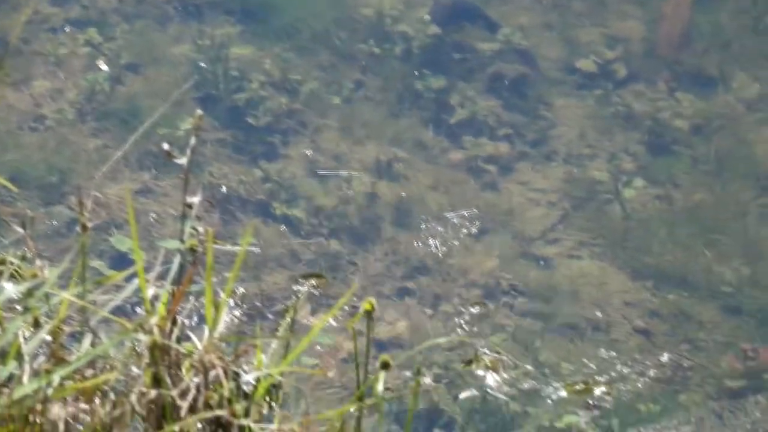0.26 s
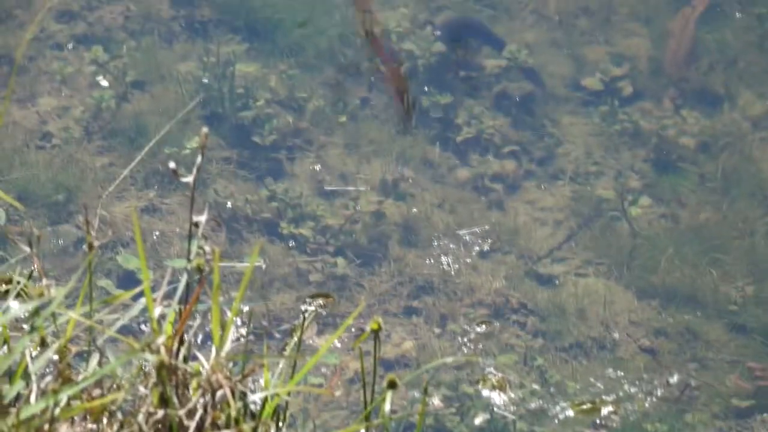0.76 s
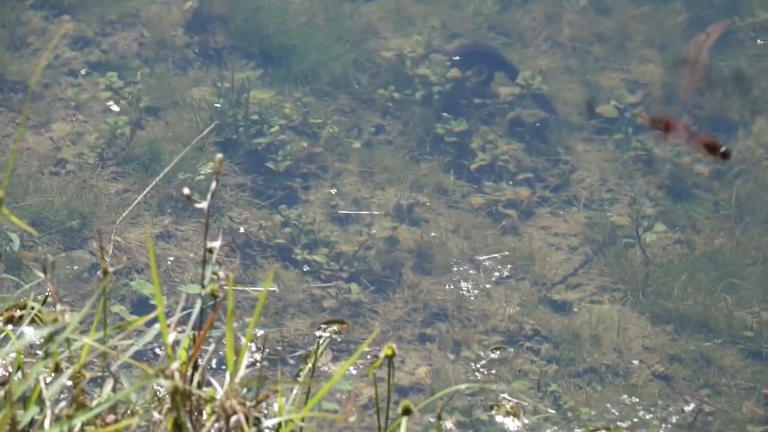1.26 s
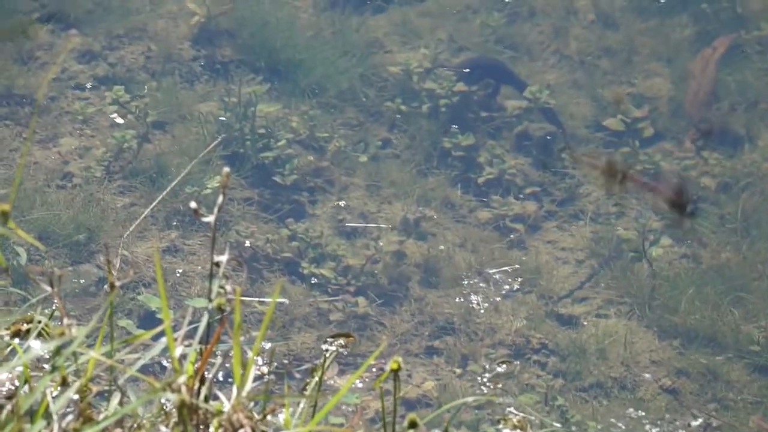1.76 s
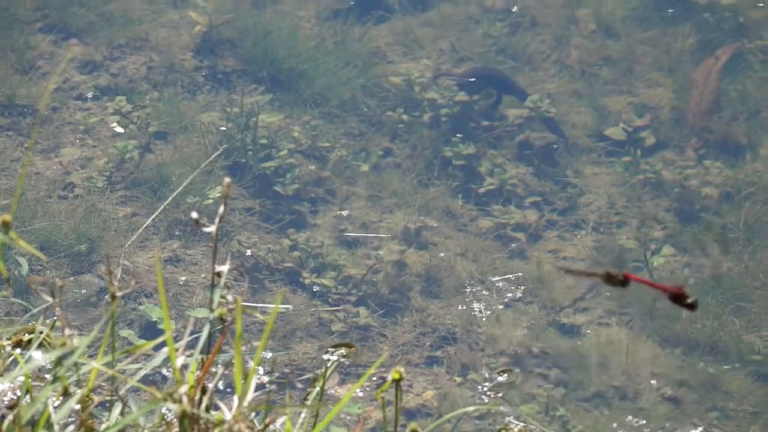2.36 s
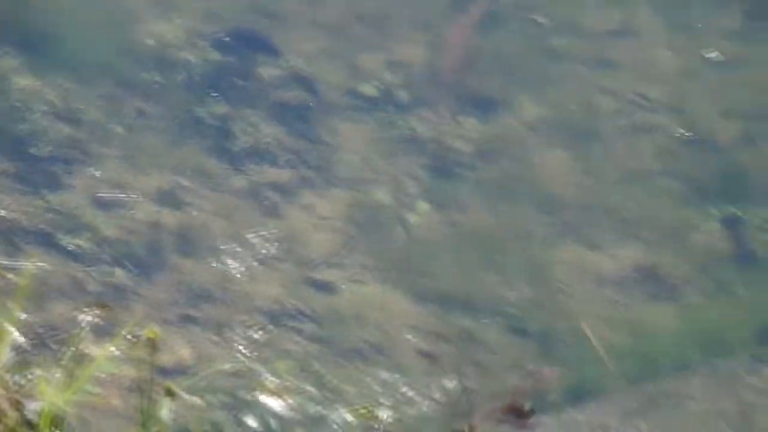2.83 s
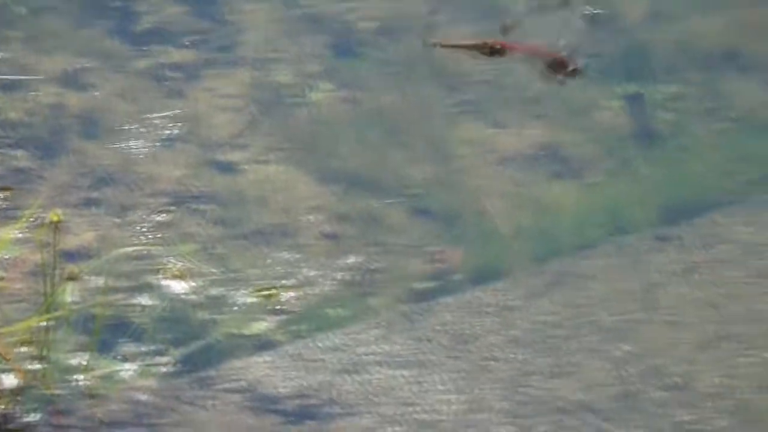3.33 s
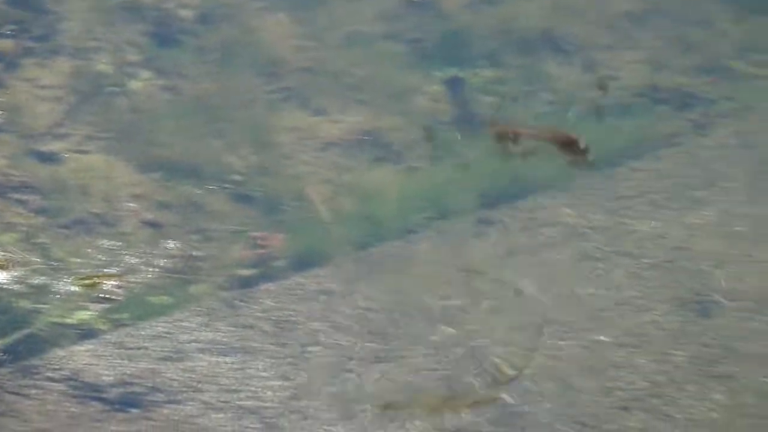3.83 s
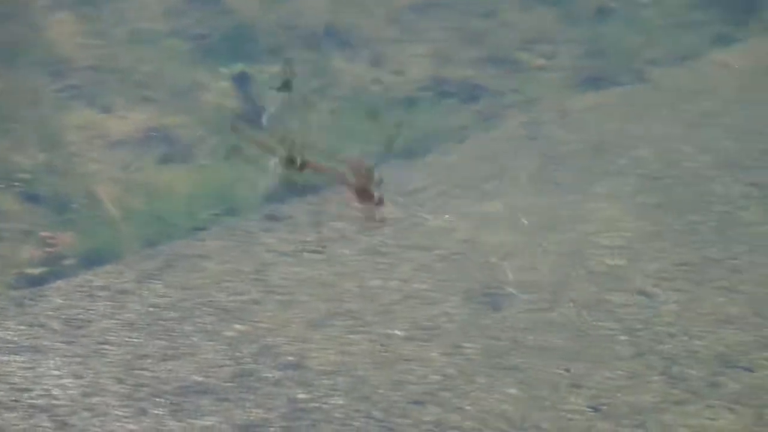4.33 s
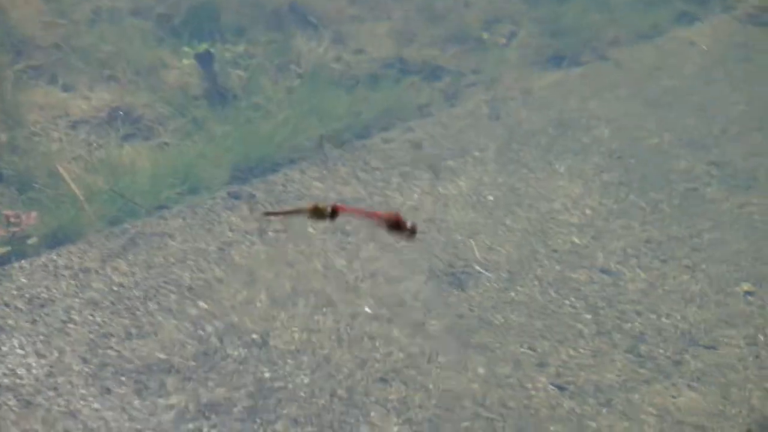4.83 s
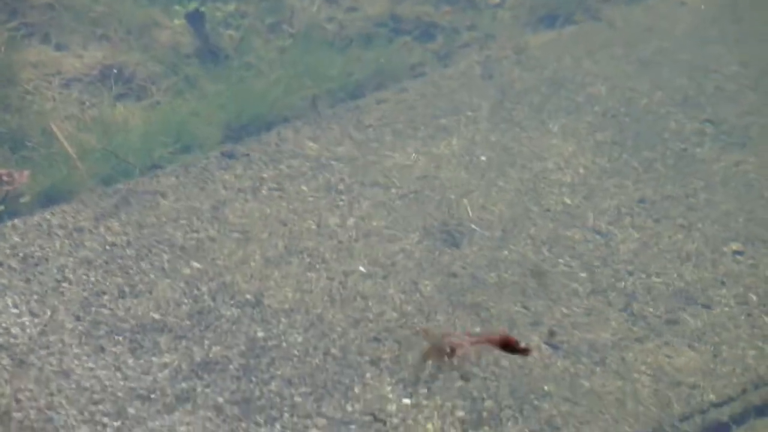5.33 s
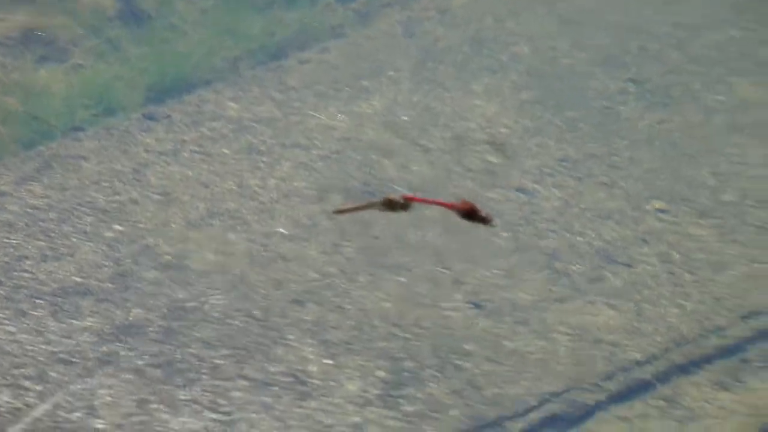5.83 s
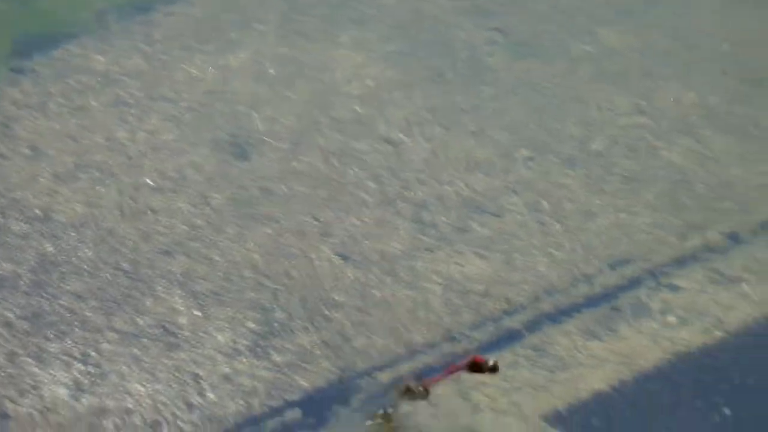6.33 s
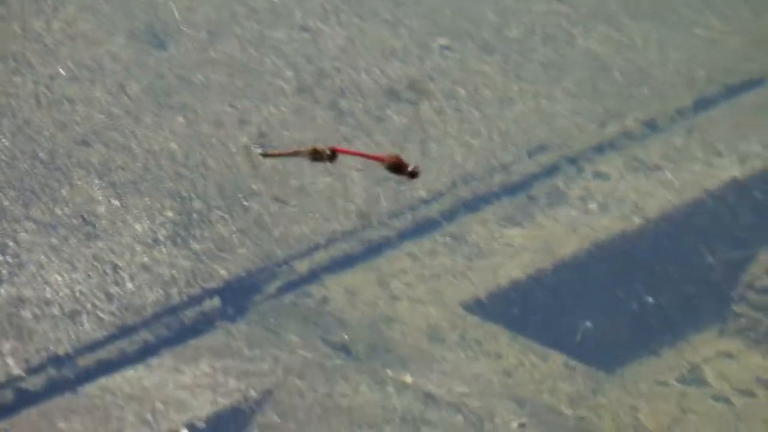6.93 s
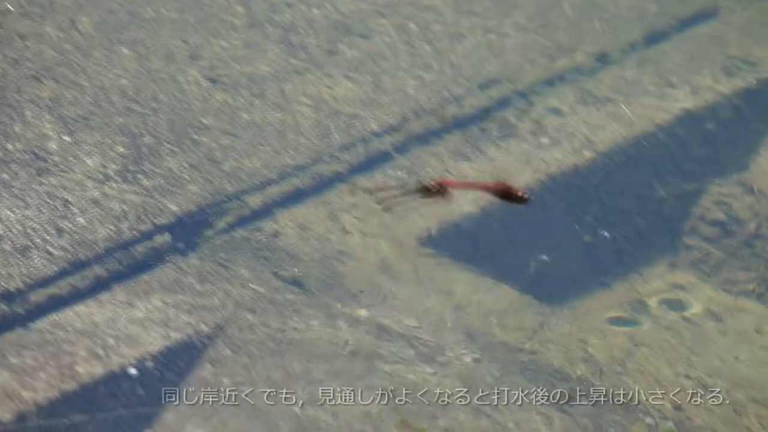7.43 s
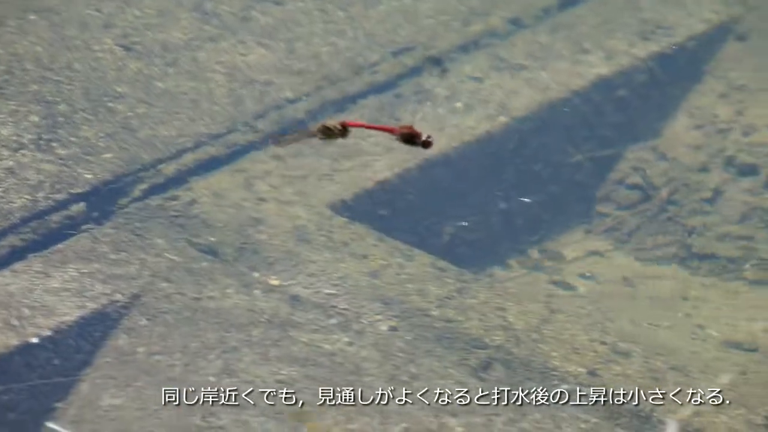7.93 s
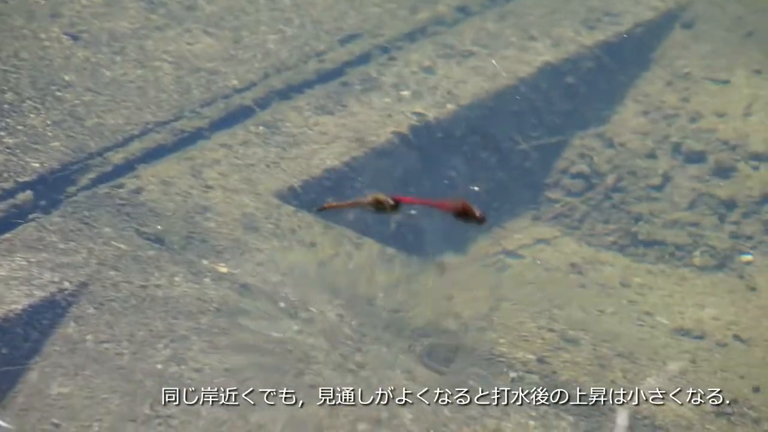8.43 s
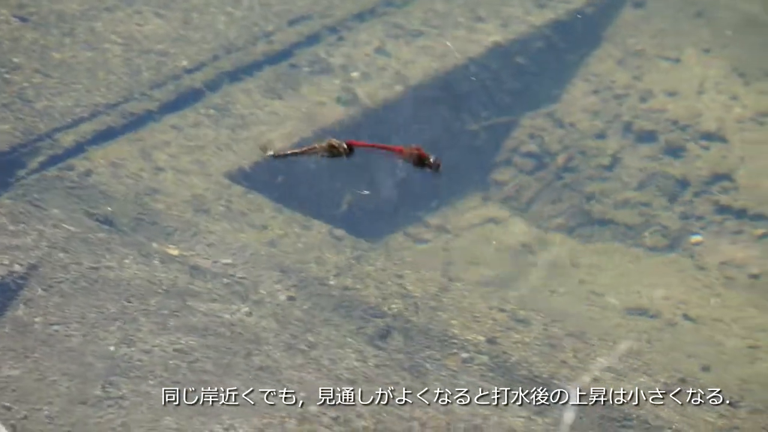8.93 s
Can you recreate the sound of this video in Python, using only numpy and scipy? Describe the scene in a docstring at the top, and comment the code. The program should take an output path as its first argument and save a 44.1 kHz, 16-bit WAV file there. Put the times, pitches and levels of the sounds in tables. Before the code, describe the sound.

A continuous high cricket trill and crisp, tiny ticks lie over airy noise and distant chorus. Clear bird calls leap up and dive at first, on the right, later thinner and more central. A second, higher insect trill comes and goes, with quick chirps and a weak croaking pulse far off. Close hollow camera taps interrupt, the loudest a dry click about two-thirds through.

```python
"""A grassy pond on a warm day, heard by a hand-held camera that pans to the right. From the start there are noise
of open air, a blurred chorus, a cricket's ringing wing strokes, decaying noise ticks, finger knocks that ring the
camera body, and birds whose gliding tones arch and slur. A chirping cricket and a higher trill join after 2 s.
A far frog's filtered throat pulses run from 3.2 to 8.3 s, falling bird calls from 4.5 to 6.6 s; one knock, at
6.23 s, is a sharp snap. The higher trill returns at 7.3 s."""
import sys
import numpy as np
from scipy import signal
from scipy.fft import rfft, irfft, next_fast_len
from scipy.io import wavfile
from scipy.ndimage import uniform_filter1d, map_coordinates

SR = 44100
rng = np.random.default_rng(int(sys.argv[2]) if len(sys.argv) > 2 else 0)


def wav_record(signal):
    """Record a signal, one row per channel, as 16-bit PCM in the file named by sys.argv[1]."""
    frames = np.transpose(np.atleast_2d(signal))
    bounded = np.clip(frames, -1, 1)
    # unit amplitude maps onto the largest positive 16-bit level
    quanta = np.round(bounded * 32767).astype(np.int16)
    wavfile.write(sys.argv[1], SR, quanta)


N = 404838

# Far chorus of birds and insects. Each row: time in seconds, relative level in dB.
CHORUS_LEVEL = [(0.0, -42), (0.15, -41.5), (2.66, -46.5), (3.78, -49), (5.42, -45), (9.18, -47.5)]
# Spectrum of the chorus. Each row: frequency in Hz, relative density in dB per Hz.
CHORUS_SPECTRUM = [(1500, -38), (2500, -14), (3000, -11), (3500, -6), (4050, 2), (4450, 0.5), (5000, 0.5),
                   (5400, 2.5), (5600, -4), (7400, -7.5), (7700, -15.5), (10400, -23.5), (17600, -120)]
# Spectrum of open air and far traffic. Each row: frequency in Hz, relative density in dB per Hz.
AIR_SPECTRUM = [(25, -26), (60, -17.5), (130, -8), (300, 0), (900, -2.5), (1500, -5), (3000, -4),
                (8000, -9), (11500, -10.5), (15800, -17.5)]
# Stereo width of the background. Each row: frequency in Hz, side over mid in dB.
WIDTH = [(60, -9), (110, 9.5), (200, 5.5), (380, 12), (700, 7), (1290, 3.5), (2380, -0.5), (4400, -6),
         (8120, -3.5), (15000, 0)]
# Scatter from bank and grass. Each row: frequency in Hz, 60 dB decay time in seconds.
REVERB_DECAY = [(2000, 1), (5000, 0.82), (9000, 0.21)]
# First echoes off water and bank. Each row: delay in seconds, gain in dB.
FIRST_ECHOES = [(.003, -14), (.008, -9), (0.014, -11)]

# Runs of strong ticks. Each row: first tick in seconds, last tick in seconds, relative level in dB.
TICK_RUNS = [(0.034, .0333, -43), (.1131, .1356, -43), (1.6751, 1.6751, -46), (2.2867, 2.2867, -44),
             (2.4618, 2.4618, -42), (2.9078, 2.9078, -44), (3.2355, 3.3628, -46), (3.9543, 4.0037, -50),
             (4.7257, 4.7257, -43), (4.8783, 4.9033, -40.5), (5.4864, 5.4864, -45), (5.6511, 5.6511, -44),
             (5.9748, 5.9998, -45), (6.4527, 6.4527, -43), (6.542, 6.6154, -42), (6.6648, 6.7121, -42),
             (7.081, 7.0808, -42), (7.3253, 7.3253, -41), (7.392, 7.3915, -42), (7.5418, 7.5895, -42),
             (8.112, 8.1604, -45), (8.4143, 8.4143, -42), (8.517, 8.5634, -47), (8.6368, 8.6842, -41),
             (8.9994, 9.0514, -51)]
TICK_EVERY_S = .0245

# Resonances of the frog's throat. Each row: centre in Hz, width in Hz, gain in dB.
THROAT = [(1900, 350, -2), (2480, 350, 1), (3280, 470, -1)]
# Unbroken runs of croaks. Each row: first croak in seconds, last croak in seconds.
CROAK_BOUTS = [(3.175, 4.62), (4.79, 6.0), (6.48, 8.255)]
# Strength of the croaking. Each row: time in seconds, relative level in dB.
CROAK_LEVEL = [(3.17, -59.5), (3.6, -51.5), (4.35, -54), (5.3, -49), (6.0, -51), (7.0, -55.5), (8.25, -53)]
CROAK_EVERY_S = .21

# Steady crickets. Each row: start in seconds, stop in seconds, wing tone in Hz, drop of the tone in Hz,
# strokes a second, first stroke in seconds, stroke length in seconds, relative level in dB.
TRILLS = [(0, 9.2, 5085, 400, 17.658, .047, .024, -45), (2.2, 5.3, 6165, 250, 22.5, .021, .018, -51),
          (7.3, 8.9, 6165, 250, 22.5, .021, .018, -50)]
# Chirping cricket. Each row: first stroke of the chirp in seconds, relative level in dB.
CHIRPS = [(2.064, -38), (2.266, -38), (2.471, -37), (4.779, -40), (6.823, -39), (7.307, -39), (7.51, -41),
          (7.715, -42)]

# Modes of the camera body. Each row: frequency in Hz, relative level in dB, 60 dB decay time in seconds,
# phase by which left leads right in radians.
BODY_MODES = [(285.5, -12, 0.18, -2), (338, -7.5, 0.069, -1.5), (519, -0.5, 0.061, -2.5),
              (658, 0, 0.045, -2), (893, 4.5, 0.022, -1.5), (1063, 1, 0.031, -2), (1165, -2, 0.042, -1.5),
              (1610, 4, 0.03, -1.96), (2550, -4, 0.051, -1.5), (3500, -12, .015, -3)]
# Finger contacts. Each row: time in seconds, relative level in dB, frequency driven most in Hz,
# spread in octaves, relative level of the crack in dB.
KNOCKS = [(.165, -45, 1200, 0.28, -60), (1.234, -38.5, 330, 1.34, -55), (2.536, -46, 1190, 0.32, -60),
          (2.854, -42, 496, 1.1, -26.5), (3.041, -37, 300, 0.95, -55), (6.141, -40, 400, 1.1, -55),
          (6.2241, -41, 1200, 0.77, -15), (6.2313, -20, 1130, 1.1, -11.5), (6.243, -31, 547, 0.9, -40),
          (8.308, -45, 1190, 0.18, -60)]

# Where the birds sit as the camera turns. Each row: time in seconds, bearing from -1 (right) to 1 (left).
BEARING = [(0, -1.05), (1.6, -1.14), (2.6, -1.1), (4.4, 0.053), (9.2, 0)]
# Arched calls: leap up, climb to a crest, dive, swing into a tail. Each row: start, crest, bottom and end
# in seconds, entry, crest, bottom and end pitch in Hz, relative level at entry, crest and end in dB.
ARCHES = [(.018, .13, .178, .24, 3910, 5950, 2440, 3496, -26.5, -35, -32),
          (.21, .31, .357, .387, 4300, 6420, 3340, 3500, -37, -48, -37),
          (.404, .512, .562, .622, 4280, 6180, 2046, 4240, -24.5, -36, -33),
          (.655, .755, .812, .815, 4030, 5760, 3000, 2900, -33, -42, -40),
          (.807, .915, .975, 1.025, 4306, 6220, 2310, 4110, -29, -39, -36),
          (1.115, 1.205, 1.285, 1.288, 4985, 5390, 2370, 2300, -39, -34, -42),
          (1.297, 1.39, 1.462, 1.53, 4750, 5330, 2130, 3560, -33, -37, -41),
          (1.535, 1.63, 1.69, 1.75, 5100, 5340, 2240, 3290, -41, -46, -46),
          (1.785, 1.88, 1.95, 2.035, 4500, 6160, 2014, 3500, -31.5, -39, -36),
          (5.712, 5.82, 5.832, 5.872, 4300, 6440, 5200, 2750, -34.5, -45, -36)]
LEAP_HZ, LEAP_S, LEAP_DB = 2150, .009, -1  # start of the leap, its duration, its level relative to entry
DIVE_BEND = 1.9  # the dive follows this power of time
DIVE_DB, TURN_DB = 5.5, -2  # dive at most this far over the crest level, low turn relative to the end level
FULL_HZ, THIN_DB_PER_OCTAVE = 4340, 16  # the voice thins below this pitch
# Falling calls: open high, drop, bounce, settle on a step and sag. Each row: start in seconds, first pitch
# in Hz, drop in seconds, drop in Hz, dip in seconds, dip in Hz, bounce in Hz, step in seconds, step in Hz,
# end in seconds, end in Hz, relative level in dB.
FALLS = [(4.535, 6670, 4.55, 6580, 4.565, 4640, 5450, 4.6, 4430, 4.64, 4300, -38.5),
         (4.988, 6600, 5.016, 6910, 5.054, 4700, 5490, 5.084, 4570, 5.17, 3950, -39.5),
         (5.403, 5860, 5.445, 6550, 5.465, 5050, 5500, 5.5, 4510, 5.59, 3850, -35),
         (6.198, 6250, 6.222, 6330, 6.27, 4110, 4720, 6.3, 4210, 6.325, 4200, -40.5),
         (6.425, 6410, 6.475, 5470, 6.487, 4610, 5220, 6.54, 4050, 6.585, 4050, -38.5)]
OPEN_DB, STEP_DB, CLOSE_DB = -3.5, -4, -17  # relative to the level of the call
BOUNCE_AT = .55  # share of the way from dip to step
WIGGLE_HZ, WIGGLES_PER_S = 120, 65  # depth before the glide is smoothed, and rate
# Short slurred notes. Each row: start in seconds, length in seconds, first, middle and last pitch in Hz,
# relative level in dB.
SLURS = [(0, .035, 5480, 4800, 4120, -32), (.165, .016, 6700, 6100, 5680, -43),
         (0.178, 0.042, 5680, 5600, 4700, -38.5), (0.187, 0.013, 3990, 4230, 4500, -38),
         (0.277, .04, 3470, 3450, 3420, -48), (0.357, 0.027, 7030, 7140, 6520, -42),
         (.622, .008, 4200, 3600, 3000, -41), (0.699, 0.043, 3560, 3520, 3430, -44),
         (0.827, 0.063, 2470, 3030, 3370, -46.5), (0.841, .014, 8410, 7900, 7200, -42),
         (0.855, 0.051, 7200, 6300, 4910, -35.5), (0.901, 0.09, 4750, 4440, 4150, -37.5),
         (1.082, 0.058, 5720, 6250, 5060, -43), (1.185, .04, 2690, 2690, 2690, -54),
         (1.324, 0.017, 6300, 6650, 5530, -42.5), (1.54, .03, 4600, 5200, 4300, -45),
         (1.375, 0.063, 4590, 4480, 4430, -42), (1.47, 0.035, 3010, 3650, 4400, -48),
         (1.8, 0.045, 3280, 3310, 3330, -48.5), (1.956, .058, 3200, 4380, 5200, -49),
         (2.312, 0.037, 3150, 3480, 3670, -52), (2.36, .014, 2200, 4300, 6300, -44),
         (2.378, .078, 6500, 7100, 7560, -51), (2.365, .048, 3780, 3920, 3950, -49),
         (2.66, 0.047, 2580, 3140, 3760, -53.5), (2.926, .048, 1670, 2400, 2820, -56),
         (3.3, 0.037, 2250, 2620, 2920, -56.5), (3.608, 0.038, 2710, 3100, 3510, -56),
         (3.625, .095, 9000, 9050, 8600, -60), (3.766, .04, 3140, 3280, 3420, -55),
         (4.329, 0.04, 6470, 6540, 6570, -50), (4.431, .04, 5080, 5100, 5170, -45),
         (4.44, .018, 5500, 5540, 5650, -42), (4.485, 0.024, 5150, 5720, 4800, -40.5),
         (4.626, 0.032, 3280, 3330, 3460, -52), (4.631, 0.031, 4300, 4560, 3880, -43),
         (4.708, 0.063, 2460, 3040, 3640, -55), (4.79, .04, 3940, 4020, 4120, -48.5),
         (5.03, .025, 4000, 4000, 4030, -48), (5.085, 0.13, 6180, 7130, 5340, -49.5),
         (5.223, .095, 3920, 4300, 4250, -50), (5.245, .05, 5320, 5300, 4400, -39.5),
         (5.296, 0.046, 4200, 3740, 3620, -49), (5.354, 0.055, 5860, 6540, 7000, -52),
         (5.525, .04, 3150, 3250, 3340, -49.5), (5.875, .05, 2850, 2750, 2470, -49),
         (5.908, .045, 6550, 7400, 5450, -48), (5.945, .012, 5600, 5420, 5300, -42),
         (5.97, .075, 5750, 6250, 6400, -50), (5.988, .021, 5520, 4450, 3900, -38),
         (6.062, .058, 4500, 3650, 3100, -52), (6.12, .035, 3050, 2800, 2540, -45),
         (6.175, 0.023, 7200, 7540, 6250, -47), (6.277, .014, 2930, 3810, 4720, -43),
         (6.317, .041, 6900, 6920, 6930, -53), (6.384, .065, 4650, 4540, 4600, -41),
         (6.45, .04, 4580, 4650, 4770, -49), (6.651, 0.025, 5250, 6440, 5080, -44),
         (6.71, .085, 4200, 3870, 3500, -46), (6.909, 0.079, 3830, 3540, 3300, -48.5),
         (7.04, .055, 3850, 4150, 4500, -49), (7.09, 0.01, 7000, 6100, 5620, -44),
         (7.101, .05, 5600, 5500, 5150, -44), (7.19, .08, 4600, 4280, 4050, -49)]
SLUR_START_DB, SLUR_END_DB = -1.5, -1

TOP_HZ = 15800  # band limit of the camera


def amp(db):
    """Level and amplitude: decibels to gain."""
    return 10 ** (np.asarray(db) / 20)


def unit(x):
    """Normalisation: a signal scaled to rms 1."""
    return x / np.sqrt(np.mean(x ** 2) + 1e-20)


def along(points, hz):
    """Interpolation of (Hz, value) points on a logarithmic frequency axis."""
    f, v = np.transpose(points)
    return np.interp(np.log(hz + 1), np.log(f + 1), v)


def wobble(rate):
    """Random modulation: a smooth curve through normal random knots, rate knots a second."""
    knots = rng.standard_normal(int(N * rate / SR) + 4)
    return map_coordinates(knots, [np.arange(N) * rate / SR])


def run_of(first, last, every):
    """Near-periodic repetition: evenly spaced times, about every seconds apart."""
    return np.linspace(first, last, round((last - first) / every) + 1)


def filtered(x, response):
    """Linear filtering: the spectrum of x times a response, real or complex, of frequency."""
    m = next_fast_len(N + SR // 2)
    return irfft(rfft(x, m) * response(np.fft.rfftfreq(m, 1 / SR)), m)[..., :N]


def rush(spectrum, patchy_db):
    """Diffuse stereo noise: mid and side shaped apart, with patches of random gain over time and frequency."""
    z = signal.stft(rng.standard_normal((2, N)), nperseg=512)[2]
    field = rng.standard_normal(z.shape[1:])
    patches = uniform_filter1d(uniform_filter1d(field, 5, 0), 8, 1)
    pair = signal.istft(z * amp(patchy_db * unit(patches)), nperseg=512)[1][:, :N]
    mid, side = filtered(pair, lambda hz: amp(along(spectrum, hz) + np.array([0 * hz, along(WIDTH, hz)])))
    return np.array([mid + side, mid - side]) / np.std(mid)  # mid has rms 1


def echoed(x, wet_db):
    """Scattering: decaying noise as the answer of the banks, with its own tail in each channel."""
    hz, t, z = signal.stft(rng.standard_normal((2, SR // 2)), SR, nperseg=256)
    decay = amp(-60 * t / along(REVERB_DECAY, hz)[:, None])
    tail = signal.istft(z * decay, SR, nperseg=256)[1]
    tail = tail / np.linalg.norm(tail[0])
    return amp(wet_db) * signal.fftconvolve(x[None], tail, axes=1)[:, :N]


def background():
    """Superposition of many far sources: noise of open air and far traffic under a blurred, swelling chorus."""
    level = np.interp(np.arange(N) / SR, *np.transpose(CHORUS_LEVEL))
    chorus = rush(CHORUS_SPECTRUM, patchy_db=1.1) * amp(.4 * wobble(8))
    air = amp(-54 + 0.57 * wobble(1.95)) * rush(AIR_SPECTRUM, patchy_db=1.5)
    return air + amp(level - 2.5) * chorus


def ticking(faint_db=-52):
    """Impulsive noise: short treble bursts decay fast; weak ones keep a steady beat under the strong runs."""
    beat = np.arange(.01, N / SR - .01, TICK_EVERY_S)
    slow_drift = 2 * wobble(4)[(beat * SR).astype(int)]
    weak_db = faint_db + 3 * rng.standard_normal(len(beat)) + slow_drift
    weak = np.transpose([beat, weak_db])
    strong = [(s, db) for first, last, db in TICK_RUNS for s in run_of(first, last, TICK_EVERY_S)]
    out, t = np.zeros((2, N + 400)), np.arange(400) / SR
    for s, db in [*strong, *weak]:
        grit = rng.standard_normal((3, len(t)))  # row 0 is common to both ports
        decay = amp(db - 1 - 60 * t / 0.012)
        out[:, round(s * SR):][:, :len(t)] += decay * (grit[0] + 0.71 * grit[1:])
    treble = [(5000, -16), (7500, 5), (10000, 5.0), (12500, 2), (16000, -13)]  # (Hz, dB)
    return filtered(out[:, :N], lambda hz: amp(along(treble, hz)))


def throat(hz):
    """Resonance: the sum of band-pass responses of alternating sign."""
    total = 0
    for k, (centre, width, db) in enumerate(THROAT):
        band = 1j * hz * width
        total = total + (-1) ** k * amp(db) * band / (centre * centre - hz * hz + band)
    return total


def frog(pitch_hz=225, rough=0.64, length=0.031):
    """Source and filter: throat pulses blurred by noise excite resonances and swell once for each croak."""
    t = np.arange(N) / SR
    cycles = np.cumsum(pitch_hz * (1 + .04 * wobble(30))) / SR
    pulses = np.diff(np.floor(cycles), prepend=0)  # one pulse a cycle
    source = (1 - rough) * unit(pulses) + rough * rng.standard_normal(N)
    times = np.concatenate([run_of(first, last, CROAK_EVERY_S) for first, last in CROAK_BOUTS])
    swell = sum(np.exp(-((t - s) / length) ** 2) for s in times)
    level = amp(np.interp(t, *np.transpose(CROAK_LEVEL)))
    croak = level * swell * unit(filtered(source, throat))
    return croak + echoed(croak, wet_db=-3.5)


def crickets(stroke_hz=53, count=4):
    """Stridulation: each wing stroke rings one narrow tone that sinks as the stroke ends."""
    t, song = np.arange(N) / SR, np.zeros(N)
    for start, stop, hz, drop_hz, rate, first, length, db in TRILLS:
        jittered = t + .002 * wobble(13)
        from_stroke = (jittered - first + .5 / rate) % (1 / rate) - .5 / rate  # seconds from mid-stroke
        progress = np.clip(from_stroke / length + .5, 0, 1)
        pitch = hz - drop_hz * progress ** 6 + 20 * wobble(60) + 70 * wobble(250)
        singing = np.clip(np.minimum(t - start, stop - t) / 0.17, 0, 1)
        level = singing * amp(db + .7 * wobble(1.2) + 2.3 * wobble(20)) * np.sin(np.pi * progress)
        song += level * np.sin(2 * np.pi * np.cumsum(pitch) / SR)
    for first, db in CHIRPS:
        progress = np.clip((t - first) * stroke_hz + .5, 0, count) % 1
        pitch = 5650 - 1200 * progress
        song += amp(db) * np.sin(np.pi * progress) ** 4 * np.sin(2 * np.pi * np.cumsum(pitch) / SR)
    return 0.7 * song + echoed(song, wet_db=-8.5)


def knocks():
    """Modal excitation: a contact rings the body modes near its own pitch, out of step at the two ports."""
    out, t = np.zeros((2, N + SR)), np.arange(SR // 5) / SR
    crack_band = signal.butter(2, [1500, 7000], "band", fs=SR)
    for s, db, centre_hz, spread, crack_db in KNOCKS:
        ring = 0
        for hz, mode_db, t60, lead in BODY_MODES:
            mismatch_db = 6.7 * (np.log2(hz / centre_hz) / spread) ** 2
            level = db + 6.0 + mode_db - mismatch_db + rng.normal(0, 1.5)
            phase = 2 * np.pi * hz * t + lead * np.array([[.5], [-.5]])
            ring = ring + amp(level - 60 * t / t60) * np.sin(phase)
        onset = 1 - np.exp(-t / 0.0017)
        grit = rng.standard_normal((3, len(t)))  # row 0 is common to both ports
        burst = amp(crack_db - 6.5 - 60 * t / 0.021) * (grit[0] + 1.1 * grit[1:])
        crack = signal.lfilter(*crack_band, burst)
        out[:, round(s * SR):][:, :len(t)] += ring * onset * amp([[.8], [-.8]]) + crack
    # a light shell carries no deep thump
    return signal.sosfilt(signal.butter(3, 200, "high", fs=SR, output="sos"), out[:, :N])


def arch(start, crest_s, bottom_s, end, entry, crest, bottom, last, db, crest_db, end_db):
    """Frequency modulation: (s, Hz, dB) along an arched call, with a voice that thins when low."""
    u = np.linspace(0, 1, num=9)[1:]
    up, climb = start + LEAP_S, crest_s - start
    s = np.r_[start, up, up + (crest_s - up) * u, crest_s + (bottom_s - crest_s) * u,
              bottom_s + (end - bottom_s) * u]
    ease = np.sin(np.pi / 2 * u)
    hz = np.r_[LEAP_HZ, entry, entry + (crest - entry) * ease, crest - (crest - bottom) * u ** DIVE_BEND,
               bottom + (last - bottom) * ease]
    corners = [start, up, start + .35 * climb, start + .7 * climb, crest_s,
               (crest_s + bottom_s) / 2, bottom_s, end]
    corner_db = [db + LEAP_DB, db, db, crest_db, crest_db,
                 min(db, crest_db + DIVE_DB), end_db + TURN_DB, end_db]
    thinning = THIN_DB_PER_OCTAVE * np.minimum(np.log2(hz / FULL_HZ), 0)
    return s, hz, np.interp(s, corners, corner_db) + thinning


def fall(start, first, drop_s, drop, dip_s, dip, bounce, step_s, step, end, last, db):
    """Frequency modulation: (s, Hz, dB) along a falling call whose pitch wiggles until it settles."""
    turn = dip_s + (step_s - dip_s) * BOUNCE_AT
    corners = [start, drop_s, dip_s, (dip_s + turn) / 2, turn, step_s, (step_s + end) / 2, end]
    s = np.linspace(start, end, num=90)
    hz = np.interp(s, corners, [first, drop, dip, .98 * bounce, bounce, step, (step + last) / 2, last])
    wiggle = WIGGLE_HZ * np.sin(2 * np.pi * WIGGLES_PER_S * (s - start)) * (s < step_s)
    effort = np.interp(s, corners, [OPEN_DB, OPEN_DB, -3, 0, 0, STEP_DB, STEP_DB, CLOSE_DB])
    return s, hz + wiggle, db + effort


def slur(start, length, first, middle, last, db):
    """Frequency modulation: (s, Hz, dB) along a parabola through three pitches."""
    u = np.linspace(0, 1, num=7)
    hz = np.polyval(np.polyfit([0, .5, 1], [first, middle, last], 2), u)
    return start + length * u, hz, db + np.interp(u, [0, .5, 1], [SLUR_START_DB, 0, SLUR_END_DB])


def birds(flutter_db=3.5, warble_hz=45, lag_s=.000018, pan_db=1.7, wet_db=-5.8):
    """Gliding tones: pitch integrates to phase, random flutter stands for close echoes, and banks answer."""
    out, flutter, warble = np.zeros((2, N)), wobble(220), wobble(260)
    notes = [arch(*a) for a in ARCHES] + [fall(*f) for f in FALLS] + [slur(*g) for g in SLURS]
    for s, hz, db in notes:
        n = np.arange(max(round((s[0] - .007) * SR), 0), round((s[-1] + 0.0045) * SR))
        t = n / SR
        glide = uniform_filter1d(np.interp(t, s, hz), size=161, mode="nearest")
        pitch = glide + warble_hz * warble[n]
        fade = np.clip(np.minimum((t - s[0]) / 0.0055, (s[-1] - t) / 0.0071) + 1, 0, 1)
        level = fade * amp(np.interp(t, s, db) + flutter_db * flutter[n])
        side = np.interp(s[0], *np.transpose(BEARING)) * np.array([[1], [-1]])
        # the nearer port hears the note earlier and louder
        cycles = np.cumsum(pitch) / SR + lag_s * side * pitch
        out[:, n] += level * amp(pan_db * side) * np.sin(2 * np.pi * cycles)
    near = 0
    for delay, db in FIRST_ECHOES:
        near = near + amp(db) * np.pad(out, ((0, 0), (round(delay * SR), 0)))[:, :N]
    return out + near + echoed(out.mean(0), wet_db)


def scene():
    """Superposition of everything that reaches the two ports."""
    return background() + ticking() + frog() + crickets() + knocks() + birds()


def record(dry):
    """Band limiting: the camera keeps nothing at or above its limit."""
    return filtered(dry, lambda hz: hz < TOP_HZ)


dry = scene()
out = record(dry)
wav_record(out)
```